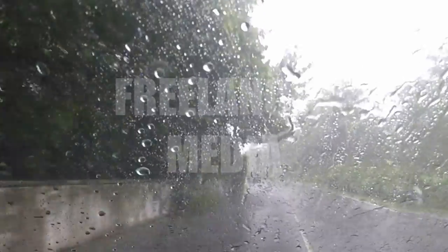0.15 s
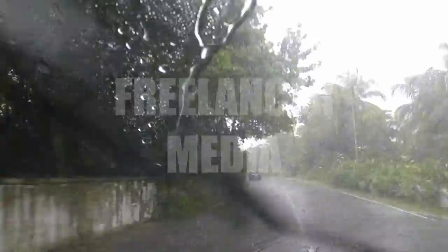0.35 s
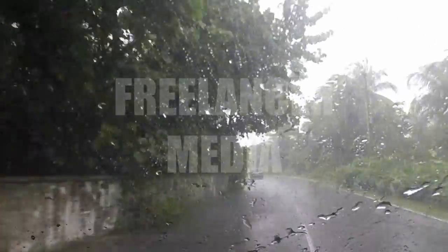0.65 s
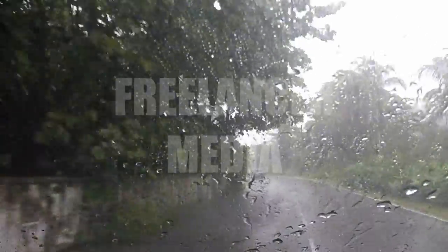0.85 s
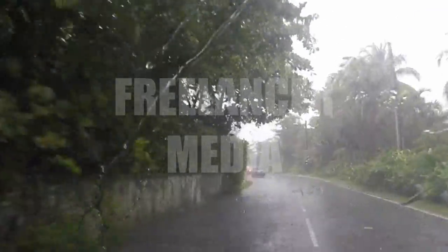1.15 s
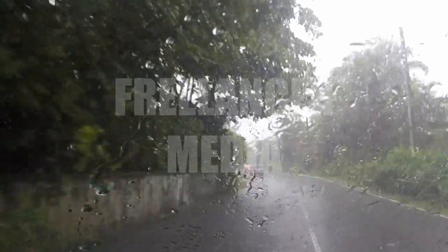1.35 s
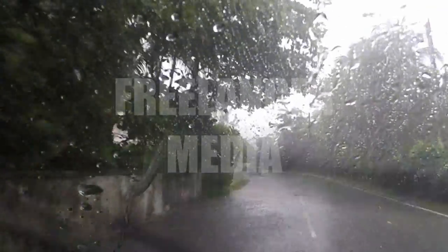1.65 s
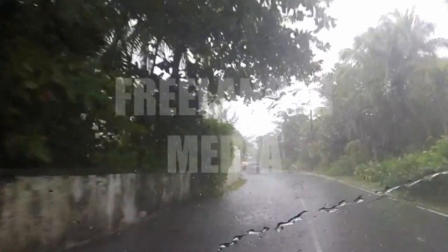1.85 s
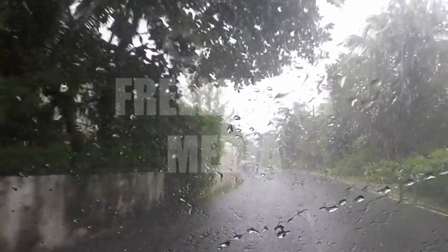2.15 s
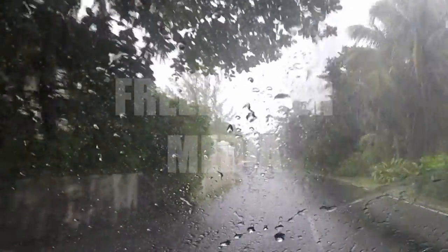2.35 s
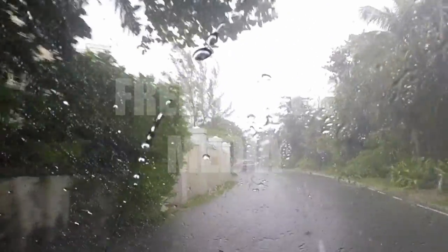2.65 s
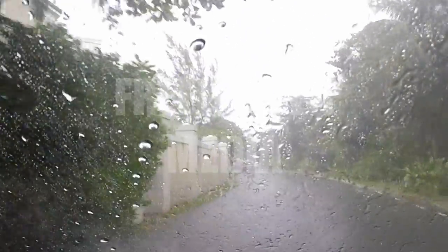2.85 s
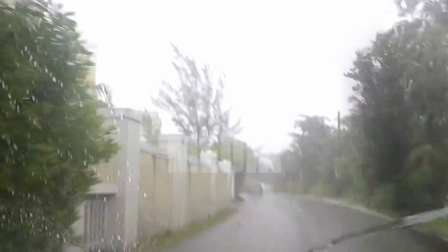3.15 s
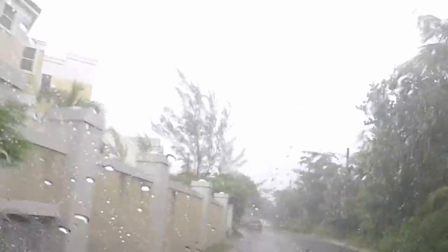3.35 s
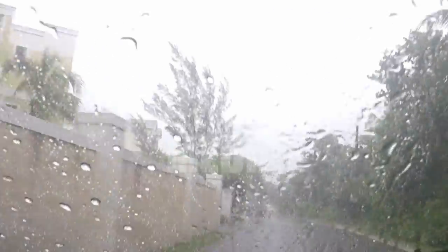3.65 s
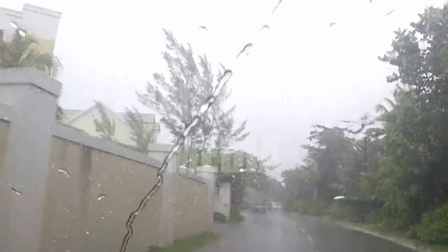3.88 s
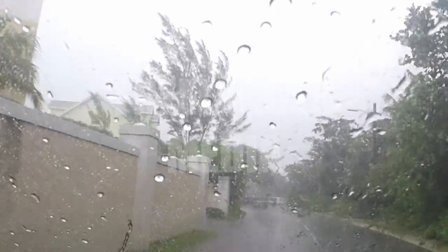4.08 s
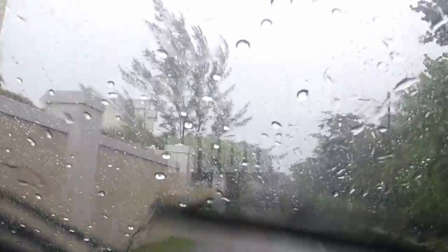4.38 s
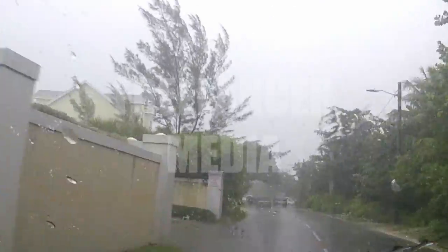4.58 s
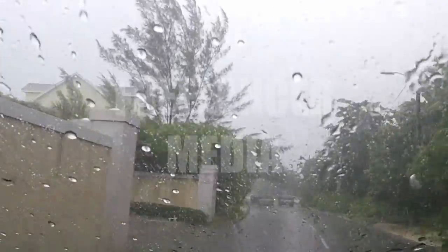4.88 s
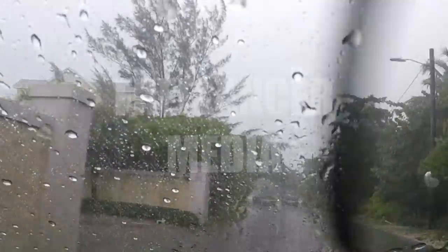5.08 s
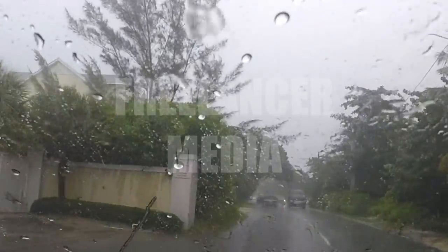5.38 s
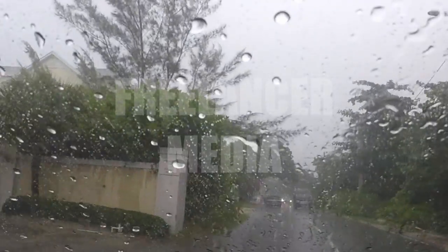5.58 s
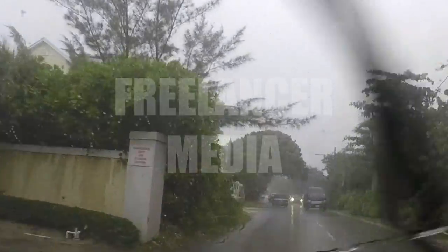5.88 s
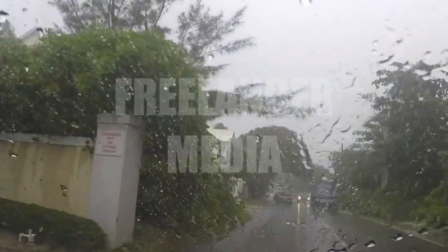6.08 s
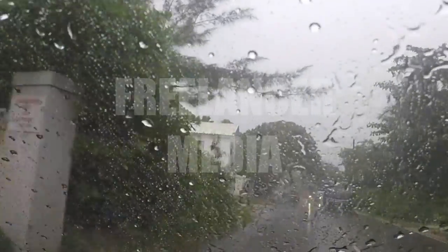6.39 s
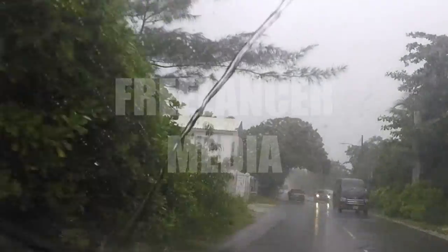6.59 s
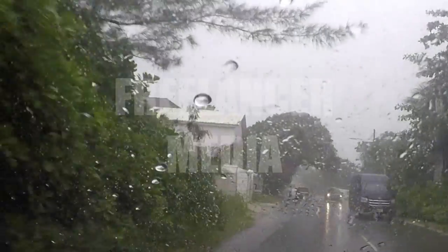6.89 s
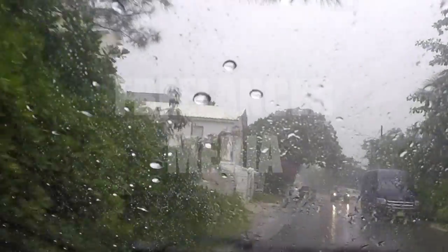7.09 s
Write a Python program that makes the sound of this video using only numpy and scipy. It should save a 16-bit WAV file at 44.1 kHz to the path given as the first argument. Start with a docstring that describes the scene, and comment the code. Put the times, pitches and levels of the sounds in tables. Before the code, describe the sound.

Inside a moving car in a downpour, close behind the windshield. Fine rain patters brightly on glass and drums dully on the lined roof over tyre roar and deep body boom that swells at bumps. Wipers rub softly and knock about every 1.4 seconds. Fat drips from trees smack the glass, thickest around three seconds, then the rain thins and slowly builds again.

```python
"""Inside a car driving through a downpour, heard from just behind the windshield.
From the start fine rain, as showers of tiny noise bursts, patters on the glass and drums on the roof, while
filtered noise makes the tyre roar and the body boom, swelling at bumps. The wiper rubber rubs at each turn;
at every other turn the linkage knocks (ringing modes) and a panel booms (a falling tone). From about one
second fat drips smack, crack and thud as single bursts; then coarse spatter falls under overhanging trees."""
import sys
import numpy as np
from scipy import signal
from scipy.fft import rfft, irfft, next_fast_len
from scipy.io import wavfile
from scipy.ndimage import uniform_filter1d

SR = 44100
rng = np.random.default_rng(int(sys.argv[2]) if len(sys.argv) > 2 else 0)


def digitize_waveform(pressure):
    """Quantize a signal to 16-bit integers and store it at the path in sys.argv[1].

    Rows of a 2-D input are taken as channels; values are limited to [-1, 1].
    """
    field = np.atleast_2d(pressure).T
    bounded = np.clip(field, -1, 1)
    quanta = np.round(bounded * 32767).astype(np.int16)
    wavfile.write(sys.argv[1], SR, quanta)


N = 318834

# Roof heard through its lining, relative spectrum: f/Hz, level/dB
ROOF_SPECTRUM = [(120, -9.5), (250, -4), (380, -4), (560, 1.5), (680, -2.5), (800, 1.5), (920, -1),
                 (1100, -8.5), (1400, -12.5), (2500, -38.5)]
# Glass struck by large drops, relative spectrum: f/Hz, level/dB
DRIP_SPECTRUM = [(400, 12.5), (1200, -3.5), (2300, 6), (3500, 4.5), (4600, -5), (6500, -13.5),
                 (9000, -25.5), (15000, -47)]
# Wiper turns at the foot of the glass: t/s, knock level/dB, panel boom level/dB, relative rubber drag level/dB
FOOT_TURNS = [(0.795, -11, -9, -26), (2.1705, -14.5, -15, -22.5), (3.546, -16, -15, -31.5),
              (4.9172, -15.5, -14.5, -33), (6.287, -9.5, -11.5, -26.5)]


def from_db(db):
    """Decibels to gain."""
    return 10 ** (np.asarray(db) / 20)


def rms_one(x):
    """Scale to unit rms."""
    return x / np.sqrt(np.mean(x ** 2) + 1e-20)


def in_time(rows):
    """Each column of a curve, interpolated sample by sample."""
    s, *columns = np.transpose(rows)
    return [np.interp(np.arange(N) / SR, s, c) for c in columns]


def coloured(x, spectrum):
    """Causal (minimum-phase) filter with the given spectrum; white noise keeps its power."""
    size = 2 * next_fast_len(len(x))
    hz, db = np.transpose(spectrum)
    octave = np.log2(np.fft.rfftfreq(size, 1 / SR) + 1)
    # above the last point the level falls a further 12 dB per octave
    fall_db = 12 * np.maximum(octave - np.log2(hz[-1]), 0)
    level_db = np.interp(octave, np.log2(hz), db) - fall_db
    # folding the cepstrum onto positive time gives minimum phase
    cepstrum = irfft(np.log(rms_one(from_db(level_db))))
    cepstrum[1:size // 2] *= 2
    cepstrum[size // 2 + 1:] = 0
    response = np.exp(rfft(cepstrum))
    return irfft(rfft(x, size) * response)[:len(x)]


def add(out, s, sound):
    """Mix a short sound in at time s."""
    at = int(np.clip(round(s * SR), 0, N - 1))
    out[at:at + len(sound)] += sound[:N - at]


def ring(force, modes):
    """A force sets damped resonators ringing, each mode at its own level."""
    out = 0
    for hz, db, t60 in modes:
        radius = from_db(-60 / (t60 * SR))
        w = 2 * np.pi * hz / SR
        feedback = [1, -2 * radius * np.cos(w), radius * radius]
        out = out + from_db(db) * signal.lfilter([0, np.sin(w)], feedback, force + 1e-18)
    return out


def splat(hit_s, tail_s, tail_db):
    """One impact: a brief noise burst plus a longer tail of spatter and cabin reflections; unit energy."""
    t = np.arange(SR // 10) / SR
    envelope = np.exp(-t / hit_s) + from_db(tail_db) * np.exp(-t / tail_s)
    burst = rng.standard_normal(len(t)) * envelope
    return burst / np.linalg.norm(burst)


def shower(per_s, spread_db, hit_s, tail_s, tail_db, count=16):
    """Drops of uneven size land at random on many spots, each spot with its own response; rms 1."""
    at = np.flatnonzero(rng.random(N) < per_s / SR)
    sizes = from_db(spread_db * np.minimum(rng.exponential(1, N), 4))
    spots = rng.integers(0, count, N)
    out = 0
    for spot in range(count):
        hits = np.zeros(N)
        hits[at] = sizes[at] * (spots[at] == spot)
        out = out + signal.oaconvolve(hits, splat(hit_s, tail_s, tail_db))[:N]
    return rms_one(out)


def rain(glass_db=1.5, roof_db=-34.5, roof_follows=0.9, tree_roof_db=3.5):
    """Bright patter from the glass, duller drumming through the lined roof, coarse spatter under the trees."""
    # Strength of the rain: t/s, level/dB (patter is glass_db above it)
    strength = [(0.0, -34.5), (0.38, -36.5), (0.54, -38), (1.19, -36.5), (1.43, -40), (1.69, -44),
                (1.91, -43), (2.03, -40.5), (2.46, -37), (2.74, -34), (2.94, -33), (3.08, -40), (3.32, -44),
                (3.75, -40), (3.94, -44), (4.15, -49), (4.43, -46), (4.61, -43.5), (5.34, -37),
                (5.6, -39.5), (5.9, -39), (6.48, -36), (6.8, -39.5), (7.23, -39.5)]
    # Glass under fine rain, relative spectrum: f/Hz, level/dB
    glass_spectrum = [(500, -7.5), (1100, -12.5), (1600, -1.5), (2300, -0.5), (2900, -2), (3500, -0.5),
                      (4000, -7.5), (5000, -10.5), (6000, -11.5), (6700, -18), (7400, -16.5), (8400, -24.5),
                      (10400, -23), (11500, -30.5), (15500, -29)]
    rain_db, = in_time(strength)
    shed = under_trees()
    # roof_db holds at mean rain; roof_follows is the drumming's share of the rain's swing in dB
    drumming_db = roof_db + roof_follows * (rain_db - rain_db.mean())
    # tree_roof_db is the extra drumming under trees, relative to the spatter
    on_roof = np.hypot(from_db(drumming_db), from_db(tree_roof_db) * shed)
    fine_drops = shower(per_s=4200, spread_db=3.3, hit_s=.0004, tail_s=.004, tail_db=-7)
    roof_drops = shower(per_s=900, spread_db=1.5, hit_s=0.0013, tail_s=0.019, tail_db=-3.5)
    tree_drops = shower(per_s=220, spread_db=3.0, hit_s=.0009, tail_s=.003, tail_db=-16)
    patter = from_db(rain_db + glass_db) * coloured(fine_drops, glass_spectrum)
    drumming = on_roof * coloured(roof_drops, ROOF_SPECTRUM)
    spatter = shed * coloured(tree_drops, DRIP_SPECTRUM)
    return patter + drumming + spatter


def road(roar_db=1, boom_db=-16, boom_follows=0.75, bump_rise_s=0.059, bump_decay_s=0.069):
    """The road shakes the body into a deep boom; the tyres roar, their air cavity ringing near 210 Hz."""
    # Roughness of the road: t/s, level/dB (tyre roar is roar_db above it)
    roughness = [(0.0, -30.5), (0.2, -33.5), (0.44, -32), (0.7, -28), (1.59, -39), (1.75, -36.5),
                 (2.22, -31), (2.82, -29.5), (3.06, -37), (3.32, -42), (3.66, -29), (4.19, -42.5),
                 (4.47, -36.5), (5.05, -29.5), (5.74, -37), (6.24, -29.5), (6.65, -32), (7.23, -33)]
    # Bumps that jolt the body: t/s, boom level/dB
    jolts = [(.23, -12.5), (1.02, -11.5), (1.22, -12), (1.4, -7.5), (2.58, -8.5), (2.96, -4), (3.63, -17),
             (3.89, -5.5), (4.17, -10), (5.49, -7.5), (7.11, -11)]
    # Body boom in the cabin, relative spectrum: f/Hz, level/dB
    boom_spectrum = [(12, -30.5), (20, -3), (24.5, 2.5), (30, -2.5), (36, 1), (43, -3.5), (50, 1),
                     (56, -5.5), (63, -18.5), (75, -20.5), (95, -30.5), (300, -75)]
    # Tyre roar in the cabin, relative spectrum: f/Hz, level/dB
    tyre_spectrum = [(50, -18.5), (72, 7), (102, -4), (125, 2.5), (160, 1), (197, -1.5), (208, 8), (222, 0),
                     (245, -4), (275, -8), (370, -5), (600, -24), (1500, -38.5)]
    t = np.arange(N) / SR
    road_db, = in_time(roughness)
    # boom_db holds on an average road; boom_follows is the boom's share of the road's swing in dB
    swell = from_db(boom_db + boom_follows * (road_db - road_db.mean()))
    for s, db in jolts:
        jolt = np.exp(-np.maximum((s - t) / bump_rise_s, (t - s) / bump_decay_s))
        swell = np.hypot(swell, from_db(db) * jolt)
    shake = coloured(rng.standard_normal(N), boom_spectrum)
    # even out the shaking, so that road and bumps alone make it swell
    shake_power = uniform_filter1d(np.abs(signal.hilbert(shake)) ** 2, size=SR // 10)
    boom = swell * rms_one(shake / np.sqrt(shake_power))
    roar = from_db(road_db + roar_db) * coloured(rng.standard_normal(N), tyre_spectrum)
    return boom + roar


def wiper_rubber(lead_s=0.022, trail_s=0.062, roll_s=0.053):
    """The rubber rubs on the glass around each turn: filtered noise swelling up and dying away."""
    # Soft turns at the far end of the sweep: t/s, level/dB
    far_turns = [(0.11, -31.5), (1.47, -38), (2.85, -28), (4.23, -39), (5.60, -29.5), (6.98, -25.5)]
    # Rubber on wet glass, relative spectrum: f/Hz, level/dB
    rubber_spectrum = [(70, -32), (125, 7.5), (175, -5), (212, 7), (290, -1), (380, 1), (600, -16.5),
                       (900, -12), (1400, -28.5), (4000, -35)]
    t = np.arange(N) / SR
    grip = 0
    for s, _, _, drag_db in FOOT_TURNS:
        grip = grip + from_db(drag_db + 7) * np.exp(-np.maximum((s - t) / lead_s, (t - s) / trail_s))
    for s, db in far_turns:
        grip = grip + from_db(db) * np.exp(-((t - s) / roll_s) ** 2)
    return grip * coloured(rng.standard_normal(N), rubber_spectrum)


def wiper_knocks(panel_hz=212, first_hz=470, settle_s=0.0053, rise_s=0.018, decay_s=0.0094, land_db=-4,
                 bounce_s=0.00261, bounce_db=-6, contact_hz=1250, contact_octaves_per_db=.06):
    """The blades flip over at the foot of the glass: the linkage knocks and the panel booms."""
    # Ringing of the wiper linkage: f/Hz, relative level/dB, t60/s
    linkage_modes = [(277, -8, 0.04), (420, 3, 0.022), (547, -1.5, 0.022), (780, 1, 0.019),
                     (960, -2, 0.012), (1160, -44, 0.031)]
    out = np.zeros(N)
    t = np.arange(SR // 10) / SR
    # bending waves carry the highs fastest, so the boom falls in pitch
    hz = panel_hz + (first_hz - panel_hz) * np.exp(-t / settle_s)
    envelope = (1 - np.exp(-t / rise_s)) ** 2 * np.exp(-t / decay_s)
    flex = np.sin(2 * np.pi * np.cumsum(hz) / SR) * envelope
    flex = flex / np.abs(flex).max()
    usual_db = np.mean(FOOT_TURNS, axis=0)[1]
    for s, knock_db, boom_db, _ in FOOT_TURNS:
        force = .6 * splat(hit_s=.004, tail_s=.015, tail_db=-12)
        # the blade lands twice
        force[0] += from_db(land_db)
        force[round(bounce_s * SR)] += from_db(land_db + bounce_db)
        # contact_hz tops an average knock; harder ones are brighter
        top_hz = contact_hz * 2 ** (contact_octaves_per_db * (knock_db - usual_db))
        band = signal.butter(3, [110, top_hz], "band", fs=SR, output="sos")
        knock = signal.sosfilt(band, ring(force, linkage_modes))
        add(out, s, from_db(knock_db) * knock + from_db(boom_db) * flex)
    return out


def drips(smack_gain_db=16.5, crack_gain_db=20.5, thud_gain_db=23.5):
    """Each fat drip smacks the glass with a sharp crack and shakes the roof."""
    # Fat drips off the trees, before the gains above:
    # t/s, smack level/dB, crack level relative to smack/dB, roof thud level relative to smack/dB
    fat_drips = [(1.029, -19, -28, -16), (1.0916, -15.5, -34, -12), (1.0974, -21.5, -31, -3),
                 (1.645, -19, -21, -14), (1.6633, -20, -25, -9), (1.712, -18.5, -35, -7),
                 (1.7906, -21, -27, -6), (1.8915, -20, -46, -18), (1.904, -22, -21, -8),
                 (1.936, -19.5, -21, -12), (1.957, -18.5, -25, -3), (2.0592, -17, -35, -11),
                 (2.0802, -16, -37, -16), (2.5326, -13.5, -27, -10), (2.5716, -14, -25, -16),
                 (2.583, -7, -29, -21), (2.6019, -10.5, -24, -6.5), (2.6529, -12.5, -21, -8),
                 (2.6863, -16, -27, -15), (2.7282, -14, -32, -12), (2.7528, -11.5, -38, -8),
                 (2.761, -13, -37, -8), (2.8943, -12.5, -36, -15), (2.9014, -13.5, -30, -11),
                 (2.9112, -19, -26, -4), (2.9462, -11, -38, -11), (2.9524, -13.5, -31, -9),
                 (2.9961, -16, -14, -10), (3.041, -13, -37, -9), (3.0793, -14, -29, -11),
                 (3.0914, -15.5, -33, -12), (3.1654, -23, -22, -1), (3.267, -21.5, -36, -2.5),
                 (3.2839, -22.5, -28, -6), (3.3103, -18, -36, -17), (3.3545, -18, -35, -4),
                 (3.4803, -23, -33, -2), (3.7347, -27.5, -32, -13)]
    smack, crack, thud = np.zeros((3, N))
    for s, db, crack_db, thud_db in fat_drips:
        add(smack, s, from_db(db) * splat(hit_s=.0019, tail_s=.008, tail_db=-13))
        add(crack, s, from_db(db + crack_db) * splat(hit_s=.0003, tail_s=.003, tail_db=-19))
        add(thud, s, from_db(db + thud_db) * splat(hit_s=0.0042, tail_s=0.038, tail_db=4))
    crack_band = signal.butter(1, [6000, 14500], "band", fs=SR, output="sos")
    crack = signal.sosfilt(crack_band, crack)
    glass = from_db(smack_gain_db) * coloured(smack, DRIP_SPECTRUM) + from_db(crack_gain_db) * crack
    return glass + from_db(thud_gain_db) * coloured(thud, ROOF_SPECTRUM)


def under_trees(edge_s=0.025):
    """Level of the water falling from the crowns overhead, fading in and out at their edges."""
    # Overhanging crowns: enter t/s, leave t/s, spatter level/dB
    crowns = [(1.87, 3.426, -41), (2.518, 3.007, -33.5)]
    t = np.arange(N) / SR
    shed = 0
    for enter, leave, db in crowns:
        cover = (np.tanh((t - enter) / edge_s) - np.tanh((t - leave) / edge_s)) / 2
        shed = shed + from_db(db) * cover
    return shed


def scene():
    """Everything as heard just behind the windshield, in one channel."""
    return (rain() + road() + wiper_rubber() + wiper_knocks() + drips())[None]


def record(dry, ceiling=.92, cutoff_hz=15300):
    """The highest peaks are rounded off and the top is cut steeply."""
    rounded = dry / (1 + (dry / ceiling) ** 8) ** (1 / 8)
    top_cut = signal.ellip(12, .1, 80, cutoff_hz, fs=SR, output="sos")
    return signal.sosfilt(top_cut, rounded)


dry = scene()
out = record(dry)
digitize_waveform(out)
```